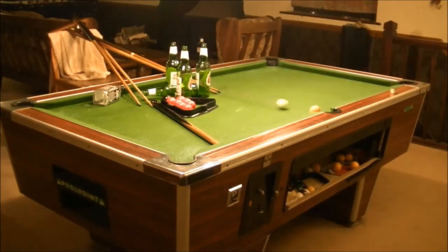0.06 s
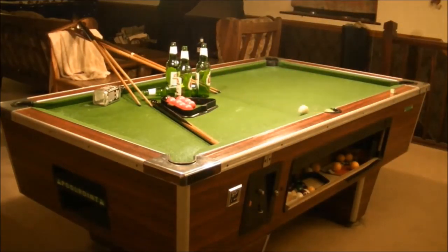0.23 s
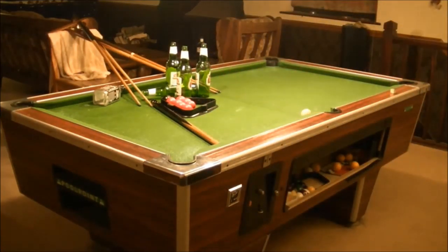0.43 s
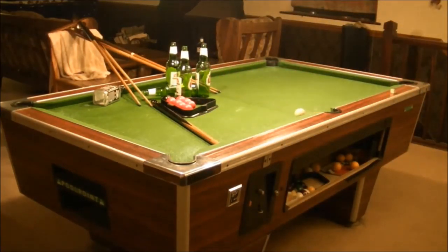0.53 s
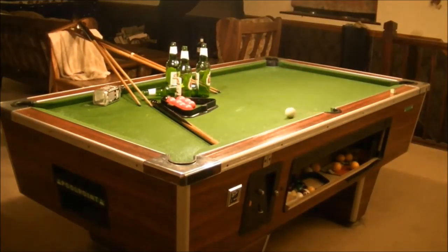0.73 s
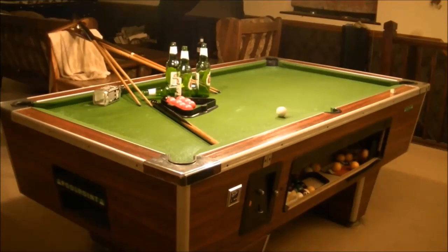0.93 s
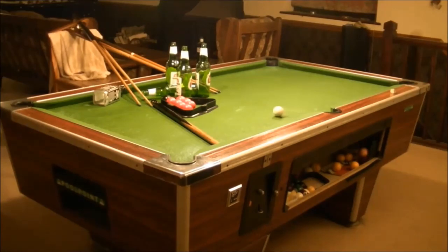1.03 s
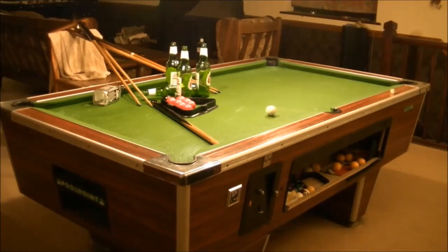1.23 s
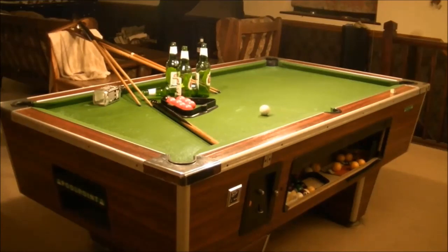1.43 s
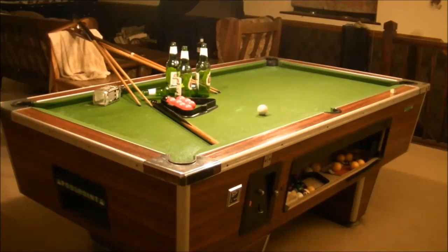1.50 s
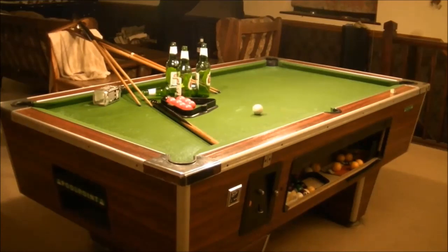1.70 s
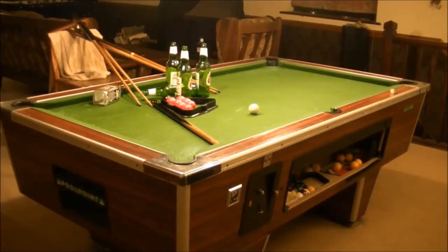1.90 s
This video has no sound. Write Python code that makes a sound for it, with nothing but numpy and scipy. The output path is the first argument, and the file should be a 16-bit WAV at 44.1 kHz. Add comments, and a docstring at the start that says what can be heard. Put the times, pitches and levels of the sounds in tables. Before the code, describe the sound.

A pool ball is pocketed close by. After a faint roll, two balls click sharply at 0.2 seconds. One knocks loudly around the pocket from 0.3 to 0.7 seconds, ending with light clinks. It drops into the wooden table with hollow, ringing knocks around 0.9 and 1.2 seconds, then rumbles and clatters down the return channel from 1.4, fading by 1.8. The quiet, slightly echoing room hums low throughout.

```python
"""A quiet, fairly live room with a low hum; a coin-operated pool table stands just right of the microphone.
One shot: the cue ball clicks against another ball, which knocks about in the pocket, drops into the
wooden cabinet and rolls clattering down the return channel. Each contact is a short pulse followed by
reflections; liner, panels and rails ring on. The loudest knocks overload the microphone."""
import sys
import numpy as np
from scipy import signal
from scipy.fft import rfft, irfft, next_fast_len
from scipy.io import wavfile
from scipy.ndimage import uniform_filter1d, minimum_filter1d

SR = 44100
rng = np.random.default_rng(int(sys.argv[2]) if len(sys.argv) > 2 else 0)


def transcribe(signal):
    """Save signal, clipped to [-1, 1], as a 16-bit WAV file at the path in sys.argv[1]."""
    frames = np.atleast_2d(signal).T
    limited = np.clip(frames, -1, 1)
    pcm = np.round(limited * 32767).astype(np.int16)
    wavfile.write(sys.argv[1], SR, pcm)


N = 85995
T = np.arange(N) / SR
SIZE = next_fast_len(N + SR)
HZ = np.maximum(np.arange(SIZE // 2 + 1) * SR / SIZE, 1)
THUMP_LAG_S = 0.01274

# knocks on the pocket's jaws and liner:
# (time [s], knock [dB], tick [dB], tick brightness [dB/octave], thump [dB], liner ring [dB])
POCKET_HITS = [(0.2909, 0, -13.5, 4, -23.5, -32), (0.3835, -4, 0.5, 2.46, -21.5, 1.5),
               (0.461, -13, -35, -10, -25.5, -5), (0.566, -35, -17, -1.5, -30.5, -17),
               (0.5833, -21, -8, -2.5, -35, -14), (0.6394, -10.5, -15, -4, -37, -6),
               (0.6739, -31, -9.5, -5.5, -37, -23)]
# ring of the ball rails: (frequency [Hz], level [dB], t60 [s])
RAIL_MODES = [(630, -22, 0.062), (783, -21.5, 0.24), (880, -17.5, 0.22), (948, -15.5, 0.079)]


def amp(db):
    return 10 ** (np.asarray(db) / 20)


def at_hz(points, hz=HZ):
    """Read a spectrum on a log-frequency axis."""
    freqs, values = np.transpose(points)
    return np.interp(np.log(hz), np.log(freqs), values)


def unit(x):
    """Scale to a mean energy of 1 per channel."""
    return x / np.sqrt(np.mean(np.sum(x ** 2, axis=-1)))


def dying(t60):
    """Exponential decay, 60 dB in t60 seconds."""
    return np.exp(-np.log(1000) * T / t60)


def through(x, response):
    """Convolve with a stereo response."""
    return signal.fftconvolve(np.atleast_2d(x), response, axes=-1)[:, :N]


def noise(colour_db=0):
    """Diffuse stereo noise, nearly mono in the bass; rms 1."""
    # stereo width: (frequency [Hz], side level [dB])
    width = [(60, -20.5), (150, -20.5), (500, -15), (1000, -13), (2000, -10), (4000, -8), (9000, -2)]
    mid, side = rfft(rng.standard_normal((2, SIZE))) * amp(colour_db)
    side = side * amp(at_hz(width))
    return unit(irfft([mid + side, mid - side], SIZE)[:, :N]) * np.sqrt(N)


def pulses(rows, colour, size=4096):
    """One pulse of the given colour per row (time [s], peak [dB], brightness [dB/octave])."""
    out = np.zeros(N + size)
    hz = np.maximum(np.arange(size // 2 + 1) * SR / size, 1)
    for s, db, tilt in rows:
        cepstrum = irfft(np.log(amp(at_hz(colour, hz) + tilt * np.log2(hz))))
        cepstrum[0], cepstrum[size // 2:] = 0, 0  # minimum phase: a sharp attack
        pulse = irfft(np.exp(rfft(2 * cepstrum)))
        start = int(s * SR)
        out[start:start + size] += amp(db) * pulse / abs(pulse).max()
    return out[:N]


def ring(blows, modes, rise_s):
    """Each blow (time [s], level [dB]) sets the modes ringing; they take a moment to build up."""
    tone = sum((-1) ** k * amp(db) * dying(t60) * np.sin(2 * np.pi * hz * T)
               for k, (hz, db, t60) in enumerate(modes))
    tone *= 1 - np.exp(-T / rise_s)
    out = np.zeros(N)
    for s, db in blows:
        start = int(s * SR)
        out[start:] += amp(db) * tone[:N - start]
    return out


def scatter(rise_s, t60):
    """A dense burst of small reflections or contacts that swells and dies."""
    return unit(noise() * (1 - np.exp(-T / rise_s)) * dying(t60))


def room(bands=16, size=40000, build_s=0.0054):
    """The room's reverberation builds up, then each band dies at its own rate."""
    # reverberation time: (frequency [Hz], t60 [s])
    decay_times = [(60, 1.2), (200, 0.93), (500, 0.6239), (1200, 0.5449), (2800, 0.51), (5000, .5),
                   (9000, 0.346), (12500, 0.31)]
    white = rfft(noise()[:, :size])
    hz = np.maximum(np.arange(size // 2 + 1) * SR / size, 1)
    centres = np.geomspace(60, 12500, bands)
    tail = 0
    for centre, weights in zip(centres, np.eye(bands)):
        band = irfft(white * np.interp(np.log(hz), np.log(centres), weights))
        tail = tail + band * dying(at_hz(decay_times, centre))[:size]
    return unit(np.pad(tail, ((0, 0), (0, N - size))) * (1 - np.exp(-T / build_s)))


def at_mic(x, echo, near_db, near_t60, room_db, echo_s=0.0031):
    """The microphone gets the direct sound, one early echo, scatter from the table, then the room."""
    response = amp(near_db) * scatter(0.0011, near_t60) + amp(room_db) * room()
    response[:, 0] += 1
    response[:, int(echo_s * SR)] += echo
    return through(x, response)


def room_tone():
    """Air all around the microphone, a steady hum and a faint late hiss."""
    # spectra of the air and hiss, and tones of the hum: (frequency [Hz], level [dB])
    air_colour = [(25, -24), (110, 16.5), (400, -11.5), (1000, -16.5), (2500, -3.5), (5000, -23),
                  (10000, -23.5), (13000, -46), (16000, -58)]
    hiss_colour = [(500, -23), (3000, -2), (6000, 4), (10000, -4), (13000, -17), (16000, -39)]
    hum_tones = [(377, -46.5), (446.8, -52.5)]
    # rise of the hiss: (time [s], level [dB])
    hiss_levels = [(1.8, -69), (1.87, -55), (1.95, -56.5)]
    hum = sum(amp(db) * np.sqrt(2) * np.sin(2 * np.pi * (hz * T + rng.random())) for hz, db in hum_tones)
    hiss = amp(np.interp(T, *np.transpose(hiss_levels))) * noise(at_hz(hiss_colour))
    return amp(-47.5) * noise(at_hz(air_colour)) + hum + hiss


def rolling():
    """Balls rumble over the slate and along the channel."""
    # course of the rumble: (time [s], level [dB])
    levels = [(0, -27.5), (0.1, -32), (0.2, -32), (0.45, -24.5), (0.68, -29.5), (0.8, -40), (0.901, -36.5),
              (1.14, -35.5), (1.22, -37.5), (1.45, -23.5), (1.66, -23), (1.719, -32.5), (1.83, -39),
              (1.95, -40)]
    # its spectrum: (frequency [Hz], level [dB])
    colour = [(25, -43), (60, -27), (105, -0.5), (150, -1.5), (195, -3), (235, 1), (285, -11), (375, 1.5),
              (450, -4), (620, -11), (850, -15.5), (1400, -19.5), (2500, -32.5), (5000, -42), (12000, -69)]
    return amp(np.interp(T, *np.transpose(levels))) * noise(at_hz(colour))


def ball_click():
    """Two hard balls meet in the open: a very short bright pulse."""
    # the contact and its slap off the wall: (time [s], level [dB])
    clicks = [(0.2075, 0.5), (0.2261, -17)]
    # click spectrum: (frequency [Hz], level [dB])
    colour = [(200, -44), (700, -15), (1400, -9), (1900, -2), (2270, 2.5), (2700, -2.5), (3000, -2.5),
              (3500, -2), (4400, -16.5), (5500, -34), (7200, -36), (9800, -33), (15000, -46)]
    click = pulses([(s, db, 0) for s, db in clicks], colour)
    return at_mic(click, echo=1.2, near_db=2, near_t60=0.023, room_db=3)


def pocket_knocks(sunk_s=0.43):
    """Each knock has a woody body, a hard tick, a ring of the liner and a late thump of the table."""
    # spectra of the three pulses: (frequency [Hz], level [dB])
    knock_colour = [(30, -38.5), (110, -15), (220, -4), (370, -1.5), (560, 2), (900, 1.5), (1150, -1),
                    (1500, 0), (2200, -11), (3500, -26), (8000, -39), (14000, -53)]
    tick_colour = [(40, -38.5), (400, -2), (1500, 11.5), (2700, 3.5), (3400, 0.5), (4000, -1), (5000, 1),
                   (6800, -6), (8800, -9), (11500, -19.5), (15500, -71)]
    thump_colour = [(25, -24), (45, -22), (62, -2), (85, -11), (120, 9.5), (180, -21), (300, -5.5),
                    (700, -40), (2000, -80.5)]
    # ring of the liner: (frequency [Hz], level [dB], t60 [s])
    liner_modes = [(351.8, -24, 0.64), (375, -25, 0.51), (765, -18, 0.14), (866, -14, 0.18),
                   (932, -31, 0.16), (1340, -19, 0.18), (1455, -28, 0.27)]
    s, knock_db, tick_db, tilt, thump_db, liner_db = np.transpose(POCKET_HITS)
    knock = pulses(zip(s, knock_db, 0 * s), knock_colour)
    tick = pulses(zip(s, tick_db, tilt), tick_colour)
    thump = pulses(zip(s + THUMP_LAG_S, thump_db, 0 * s), thump_colour)
    in_view = T < sunk_s  # from below the rim, knock and tick reach the microphone only by reflection
    return (at_mic(knock * in_view, echo=1.0, near_db=5.5, near_t60=0.061, room_db=6)
            + at_mic(tick * in_view, echo=0.57, near_db=4, near_t60=0.027, room_db=5)
            + through((knock + tick) * ~in_view, amp(5.5) * scatter(0.0064, 0.058) + amp(4.5) * room())
            + through(thump, amp(7.5) * scatter(0.049, 0.16))
            + ring(zip(s, liner_db), liner_modes, rise_s=0.0011))


def pocket_hollow():
    """The air in the pocket gives each knock on the liner a short, pitched bark."""
    # resonance of the hollow: (frequency [Hz], level [dB])
    colour = [(100, -28), (550, -22.5), (760, -3), (930, 2.5), (1080, -11), (1400, -13), (4000, -58.5),
              (15000, -87)]
    barks = pulses([(s, liner_db, 0) for s, *_, liner_db in POCKET_HITS], colour)
    return through(barks, amp(0.5) * scatter(0.0017, 0.035) + amp(-7) * room())


def table_boom():
    """The table's body booms after heavy blows."""
    # booms: (time [s], level [dB])
    booms = [(0.305, 0), (0.455, 5), (0.975, 4.5), (1.495, 7), (1.585, 2)]
    # the body's deep mode: (frequency [Hz], level [dB], t60 [s])
    body_mode = [(64, -27.5, 0.28)]
    return ring(booms, body_mode, rise_s=0.039)


def trim_clinks():
    """The pocket trim clinks lightly, heard mostly by reflection."""
    # clinks: (time [s], level [dB])
    hits = [(0.6742, -18.5), (0.7876, -25)]
    # their spectrum: (frequency [Hz], level [dB])
    colour = [(400, -47), (1600, -14), (2600, -11), (3350, 8), (4050, -8), (4700, 0), (5250, 3),
              (5750, -15), (6450, -6), (8000, -25), (12000, -44)]
    clinks = pulses([(s, db, 0) for s, db in hits], colour)
    return through(clinks, amp(6.5) * scatter(0.0015, 0.065) + amp(1) * room())


def cabinet_drop():
    """The ball falls on wood inside the cabinet; hollow knocks set the panels and rails ringing."""
    # bounces: (time [s], level [dB], brightness [dB/octave], panel ring [dB], rail ring [dB])
    bounces = [(0.9238, 3.5, 0.5, 2.5, -17), (0.968, -6, 2.5, -2, -13), (1.1552, 1.5, -1.94, 2, 0),
               (1.228, -39, 12, -19, -29), (1.2747, -10, -6.5, -10.5, -2)]
    # knock spectrum: (frequency [Hz], level [dB])
    colour = [(30, -46), (80, -30), (150, -8.5), (220, -11), (340, 2.5), (560, 2.5), (900, -0.5),
              (1120, -3.5), (1700, -8.5), (2300, -21), (4000, -32), (8000, -45.5), (15000, -71)]
    # ring of the panels: (frequency [Hz], level [dB], t60 [s])
    panel_modes = [(142.8, -29.5, 0.65), (255, -43, 0.56), (346, -23.5, 0.25), (386.5, -26, 0.67),
                   (544, -26.5, 1), (579, -21.5, 0.29), (587, -31, .22), (684, -26.5, 0.57),
                   (996, -28, 0.3), (1790, -27, 0.05)]
    s, db, tilt, panel_db, rail_db = np.transpose(bounces)
    knocks = pulses(zip(s, db, tilt), colour)
    return (at_mic(knocks, echo=-0.085, near_db=1.5, near_t60=0.049, room_db=4)
            + ring(zip(s, panel_db), panel_modes, rise_s=0.00067)
            + ring(zip(s, rail_db), RAIL_MODES, rise_s=0.00045))


def return_channel():
    """The ball rattles down the channel: bursts of tiny contacts over hollow, ringing thumps."""
    # clatters: (time [s], level [dB], brightness [dB/octave], thump [dB], wall ring [dB], rail ring [dB])
    clatters = [(1.3763, -3, 0.5, -13, -4, 4.5), (1.4791, -1, 1.2, -10, 3, -31),
                (1.5816, -4.5, 1, -13.5, 0, -12), (1.725, -24.5, -4, -29, -18, -42)]
    # spectra of contact and thump: (frequency [Hz], level [dB])
    contact_colour = [(30, -29), (150, -16), (400, 0.5), (800, 4.5), (1100, 0), (1500, -1.5), (2200, -7.5),
                      (3500, -12.5), (4800, -15), (7000, -21), (10000, -29), (12500, -45), (16000, -71)]
    thump_colour = [(25, -36), (60, -7), (85, -13), (130, 7), (185, -16), (240, 7), (340, 8), (480, -9),
                    (900, -39), (2500, -83)]
    # ring of the channel walls: (frequency [Hz], level [dB], t60 [s])
    wall_modes = [(108.3, -29, 0.83), (237.7, -14, 0.56), (366.3, -24, 0.65), (623, -17, 0.33),
                  (1618, -25, 0.25)]
    s, db, tilt, thump_db, wall_db, rail_db = np.transpose(clatters)
    contacts = [pulses([row], contact_colour) for row in zip(s, db, tilt)]
    bursts = sum(through(contact, amp(10) * scatter(0.0096, 0.13)) for contact in contacts)
    thump = pulses(zip(s + THUMP_LAG_S, thump_db, 0 * s), thump_colour)
    return (bursts + through(sum(contacts), amp(5) * room())
            + through(thump, amp(5.5) * scatter(0.019, 0.26))
            + ring(zip(s, wall_db), wall_modes, rise_s=0.017)
            + ring(zip(s, rail_db), RAIL_MODES, rise_s=0.018))


def scene():
    """The shot and the room tone, all slightly right of the microphone."""
    right_db = 1.15
    shot = (ball_click() + pocket_knocks() + pocket_hollow() + table_boom() + trim_clinks()
            + cabinet_drop() + return_channel() + rolling())
    return (shot + room_tone()) * amp([[-right_db / 2], [right_db / 2]])


def record(dry):
    """A fast limiter holds the loudest peaks, what still overloads is clipped, and the top is cut."""
    ceiling, limiter_s, cutoff_hz = 1.19, 0.0013, 16000
    window = int(limiter_s * SR)
    gain = ceiling / np.maximum(abs(dry).max(axis=0), ceiling)
    limited = dry * uniform_filter1d(minimum_filter1d(gain, window), window)
    lowpass = signal.cheby2(12, 70, cutoff_hz, fs=SR, output="sos")
    return signal.sosfilt(lowpass, np.clip(limited, -1, 1))


dry = scene()
out = record(dry)
transcribe(out)
```